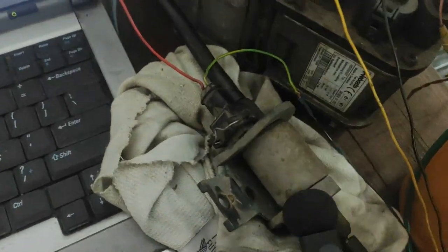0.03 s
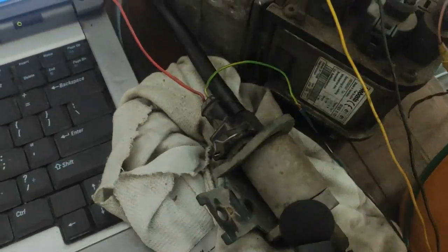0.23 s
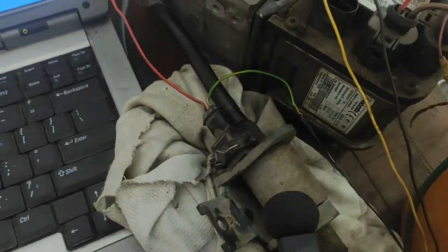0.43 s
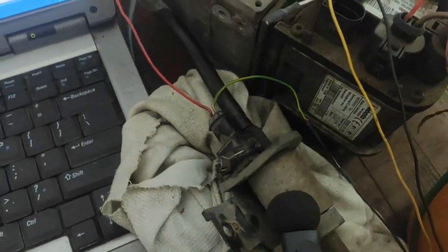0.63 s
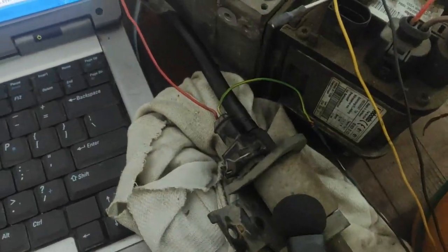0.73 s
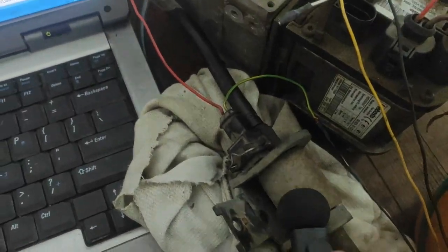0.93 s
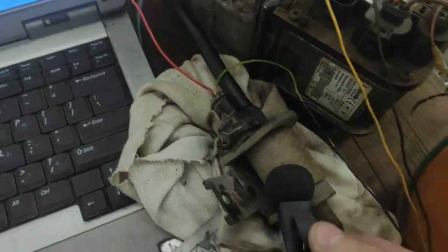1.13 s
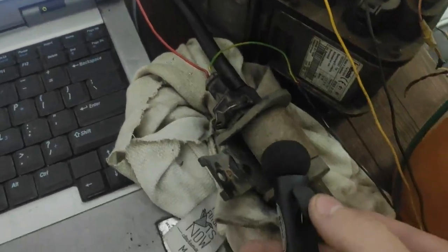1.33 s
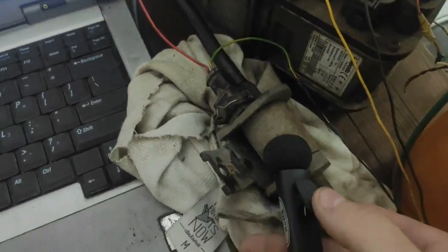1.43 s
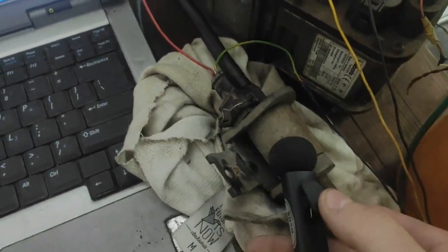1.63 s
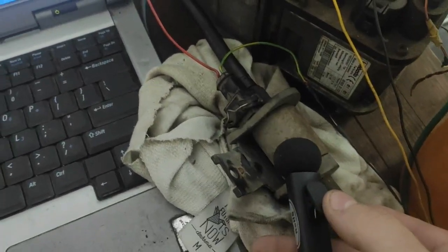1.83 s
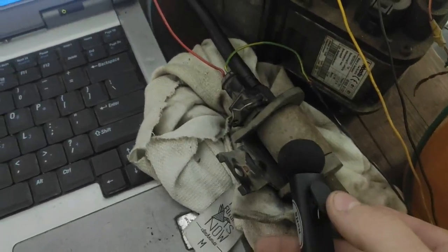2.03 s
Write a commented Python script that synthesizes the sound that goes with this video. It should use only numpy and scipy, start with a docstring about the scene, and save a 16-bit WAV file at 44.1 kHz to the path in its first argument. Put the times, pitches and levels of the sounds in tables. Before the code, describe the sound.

A small solenoid pump ticks steadily five times a second, with microphone handling bumps early on.

```python
"""Ticking, five times a second, from a small solenoid fuel pump on a rag on a workbench, over a faint hum.
Each stroke is a clack of the plunger on its stop and a softer knock back on its seat, made of
filtered impulses, noise chatter and dying casing modes; shaped noise and tones fill the gaps.
A hand moves a microphone up to the pump: rubs, a scrape and rustles of tiny random slips,
clicks and crackles of short dying noise, and bumps as low dying tones. The room answers faintly."""
import sys
import numpy as np
from scipy import signal
from scipy.fft import rfft, irfft, next_fast_len
from scipy.io import wavfile
from scipy.ndimage import map_coordinates

SR = 44100
rng = np.random.default_rng(int(sys.argv[2]) if len(sys.argv) > 2 else 0)


def output_pcm(signal):
    """Save a mono or channel-first signal as 16-bit PCM at the path in sys.argv[1].

    Samples are clipped to [-1, 1] before scaling.
    """
    pcm = np.clip(np.atleast_2d(signal).T, -1, 1) * 32767
    wavfile.write(sys.argv[1], SR, np.round(pcm).astype(np.int16))


N = 92521
T = np.arange(N) / SR  # time in the scene, s
RING = T[:8192]  # time within one short sound, s


def amp(db):
    """Decibels to gain."""
    return 10 ** (np.asarray(db) / 20)


def unit(x):
    """Scale to rms 1."""
    return x / np.sqrt(np.mean(x ** 2) + 1e-20)


def burst(x):
    """Scale to the energy of 5 ms at rms 1."""
    return x * np.sqrt(.005 * SR / (np.sum(x ** 2) + 1e-20))


def colour(x, points):
    """Causal minimum-phase filter through (freq_hz, level_db) points, by folding the cepstrum."""
    m = len(RING)
    hz, db = np.transpose(points)
    log_bins = np.log(np.fft.rfftfreq(m, 1 / SR) + 1)
    cepstrum = irfft(np.log(amp(np.interp(log_bins, np.log(hz), db))))
    cepstrum[1:m // 2] *= 2
    cepstrum[m // 2 + 1:] = 0
    return signal.fftconvolve(x, irfft(np.exp(rfft(cepstrum))))[:len(x)]


def add(out, s, x):
    """Mix x into out at time s, trimmed to the scene."""
    i = int(round(s * SR))
    x = x[max(-i, 0):max(N - i, 0)]
    out[max(i, 0):max(i, 0) + len(x)] += x


def swell(t, rise, fall):
    """A bell that peaks at t = 0."""
    return np.exp(-.5 * (t / np.where(t < 0, rise, fall)) ** 2)


def wander(points, rate_hz):
    """A smooth random curve through new values at the given rate."""
    return map_coordinates(rng.standard_normal(points), [T * rate_hz])


def friction(swells, spectrum, slips_per_s=1500, smooth=0.62, clump_db=0.0):
    """Rubbing: tiny random slips mixed with a smooth share of hiss; clump_db makes the level uneven."""
    slips = rng.standard_normal(N) * (rng.random(N) < slips_per_s / SR)
    grain = np.sqrt(smooth) * rng.standard_normal(N) + np.sqrt(1 - smooth) * unit(slips)
    grain = grain * amp(clump_db * wander(2048, 420))
    level = sum(amp(db) * swell(T - s, rise, fall) for s, rise, fall, db in swells)
    return unit(colour(grain, spectrum)) * level


# Workshop air at the microphone: freq_hz, level_db
AIR_TONE = [(20, -3), (55, -9.5), (92, 2.5), (135, -4.5), (200, -6), (300, -7), (420, -9.5), (620, -16),
            (900, -12.5), (2200, -22.5), (6000, -25.5), (16000, -34)]
# Faint hum: pitch_hz, level_db
HUM = [(198, -62), (408, -69), (594, -70.5)]
AIR_DB = -57
HUM_WAVER_DB, HUM_DRIFT_RAD, WAVER_HZ = 1.5, .5, 12


def background():
    """Workshop air as coloured noise, and hum tones that waver in level and phase."""
    out = amp(AIR_DB) * unit(colour(rng.standard_normal(N), AIR_TONE))
    for hz, db in HUM:
        level = amp(db + HUM_WAVER_DB * wander(256, WAVER_HZ))
        phase = 2 * np.pi * hz * T + HUM_DRIFT_RAD * wander(256, WAVER_HZ)
        out += level * np.sqrt(2) * np.sin(phase)
    return out


# Rebound chatter: freq_hz, level_db
CHATTER_TONE = [(200, 0.5), (900, -14.5), (1600, 4.5), (3000, -0.5), (5000, -11.5), (6400, -5), (8000, -7),
                (11500, -19), (16000, -16.5)]
# Casing modes: pitch_hz, t60_s, clack_level_db, knock_level_db (both relative to the blow)
CASING = [(200, 0.22, -32.5, -31.5), (323, 0.057, -15.5, -3), (601.5, 0.19, -31.5, -49),
          (659, 0.07, -41, -17.5), (793, 0.026, -27.5, -8.5), (1092, 0.042, -20, -16.5),
          (1820, 0.006, -25, -13), (2880, 0.0074, -40, -44), (4310, 0.0032, -40, -42),
          (6300, 0.0047, -25, -23), (6440, 0.0079, -12, -4), (11060, 0.0048, -16, -22)]
COLOUR_VARY_DB = 1.2  # random change at each point of a crack's spectrum


def blow(spectrum, mode_dbs, chatter, vary_db):
    """One impact of the plunger: a hard crack, a rebound chatter and the dying modes of the casing."""
    delay, spread, chatter_db = chatter
    varied = [(hz, db + rng.normal(0, COLOUR_VARY_DB)) for hz, db in spectrum]
    out = burst(colour(1. * (RING == 0), varied))
    rattle = rng.standard_normal(len(RING)) * swell(RING - delay, spread, spread)
    out += amp(chatter_db) * burst(colour(rattle, CHATTER_TONE))
    for (hz, t60, *_), db in zip(CASING, mode_dbs):
        mode = np.sin(2 * np.pi * hz * RING) * amp(-60 * RING / t60)
        out += amp(db + rng.normal(0, vary_db)) * mode
    return out


# Pump strokes: start_s, clack_level_db, knock_level_db, bounce_level_db (relative to the knock)
STROKES = [(-.0182, -17, -29, -22), (0.1826, -16.5, -24, -11), (0.3838, -17.5, -28, -16),
           (0.5847, -19.5, -29.5, -6.5), (0.786, -17, -27, -13), (0.9866, -17, -27.5, -14),
           (1.1876, -17.5, -27.5, -10), (1.3885, -17.5, -26.5, -14), (1.5899, -17.5, -27, -9),
           (1.7907, -17, -28, -5), (1.9918, -17.5, -26.5, -11)]
# Crack on the stop: freq_hz, level_db
CLACK_TONE = [(59, -41.5), (100, -9.5), (315, -5), (818, -15.5), (1130, -2), (1450, -5), (1800, 0.5),
              (2580, -6), (2930, -4), (3320, -13.5), (3950, -10), (4870, -23.5), (6020, -8), (6420, -4.5),
              (7290, -25), (8830, -37.5), (11200, -52), (13500, -70), (16000, -59)]
# Crack on the seat: freq_hz, level_db
KNOCK_TONE = [(59, -27), (100, -13.5), (170, 0.5), (277, 4.5), (705, -3), (950, -1), (1760, -3.5),
              (2580, -13), (2860, -14), (3190, -18), (4980, -16.5), (6420, -12), (7290, -21), (9610, -28.5),
              (11600, -22), (15000, -29), (16000, -25)]
# Bounce on the seat: freq_hz, level_db
BOUNCE_TONE = [(100, -30), (800, -3.5), (1700, 5.5), (2600, -8), (4200, -10.5), (6400, -7), (8000, -33),
               (16000, -30)]
# Rebound chatter of each blow: delay_s, spread_s, level_db
CLACK_CHATTER, KNOCK_CHATTER = (0.0012, 0.00079, -15.5), (0.0014, 0.00088, -14.5)
RETURN_S = .0422  # from clack to knock
BOUNCE_S, BOUNCE_SCATTER_S = 0.001705, .00004


def plunger():
    """The clack on the stop and the opposite knock back on the seat; the knock bounces once."""
    out = np.zeros(N)
    _, _, clack_modes, knock_modes = np.transpose(CASING)
    bounce = burst(colour(1. * (RING == 0), BOUNCE_TONE))
    for s, clack_db, knock_db, bounce_db in STROKES:
        clack = blow(CLACK_TONE, clack_modes, CLACK_CHATTER, vary_db=1.4)
        knock = blow(KNOCK_TONE, knock_modes, KNOCK_CHATTER, vary_db=2.0)
        bounce_s = s + RETURN_S + rng.normal(BOUNCE_S, BOUNCE_SCATTER_S)
        add(out, s, amp(clack_db) * clack)
        add(out, s + RETURN_S, -amp(knock_db) * knock)
        add(out, bounce_s, -amp(knock_db + bounce_db) * bounce)
    return out


def each_stroke(rows):
    """Repeat rows timed from the clack in every stroke."""
    return [(s + after, *rest) for s, *_ in STROKES for after, *rest in rows]


# Plunger sliding: start_s (of the peak, from the clack), rise_s, fall_s, level_db
SLIDES = [(-.0175, 0.0013, 0.0013, -44), (-.012, 0.0014, 0.0015, -41.5), (-.002, .005, 0.0019, -43.5),
          (.004, .003, 0.015, -47), (.0405, 0.0066, 0.0026, -49)]
# Tone of the sliding: freq_hz, level_db
SLIDE_TONE = [(150, -5), (500, 2.5), (1000, 3.5), (1500, -10.5), (3000, -7.5), (4500, -10), (6200, -8.5),
              (8000, -17), (16000, -39)]


def slides():
    """Grainy friction of the plunger within each stroke."""
    return friction(each_stroke(SLIDES), SLIDE_TONE, slips_per_s=850, smooth=0.33)


# Soft casing hums: start_s (of the peak, from the clack), rise_s, fall_s, pitch_hz, level_db
GROANS = [(-0.026, 0.0093, 0.002, 273, -54), (0.024, 0.013, 0.0011, 600, -51),
          (0.0023, 0.0044, 0.011, 1030, -44), (.129, 0.0028, 0.0077, 574, -52.5),
          (0.129, 0.0072, 0.017, 412, -61), (0.079, 0.0089, 0.021, 790, -64)]


def groans():
    """Soft hums of the casing as the plunger moves: swelling sines."""
    out = np.zeros(N)
    t = RING - RING.mean()  # room for the rise before the peak
    for s, rise, fall, hz, db in each_stroke(GROANS):
        tone = np.sqrt(2) * np.sin(2 * np.pi * hz * t)
        add(out, s + t[0], amp(db) * tone * swell(t, rise, fall))
    return out


# Scratch of the plunger: start_s (of the peak, from the clack), rise_s, fall_s, level_db
SCRATCHES = [(.032, 0.00088, 0.0013, -49), (.039, 0.0013, 0.0036, -45.5)]
# Tone of the scratch: freq_hz, level_db
SCRATCH_TONE = [(300, -32), (2000, -7), (4500, 4), (6300, 6), (8500, -7), (11800, 0.5), (14000, -10),
                (16000, -7)]


def scratches():
    """Thin friction of the plunger as it springs back."""
    return friction(each_stroke(SCRATCHES), SCRATCH_TONE)


# Valve chirps: start_s (of the peak, from the clack), rise_s, fall_s, level_db
CHIRPS = [(-.003, 0.00075, 0.00074, -41), (.0388, 0.00076, 0.0017, -45)]
# Tone of the chirps: freq_hz, level_db
CHIRP_TONE = [(100, -40), (4500, -9), (5700, 0), (6300, -6), (6900, 0), (8000, -37), (16000, -38)]


def chirps():
    """Brief high valve noise just before each blow."""
    return friction(each_stroke(CHIRPS), CHIRP_TONE)


# Swish through the pump: start_s (of the peak, from the clack), rise_s, fall_s, level_db
SWISHES = [(.083, 0.021, 0.011, -52.5), (.126, 0.009, 0.012, -57.5)]
# Tone of the swish: freq_hz, level_db
SWISH_TONE = [(100, -14), (700, 7.5), (1300, -3.5), (2200, -2), (4000, -14), (8000, -22), (16000, -27)]


def swishes():
    """Soft noise through the pump after the plunger's return."""
    return friction(each_stroke(SWISHES), SWISH_TONE)


# Casing response around its resonances: centre_hz, width_hz, level_db (negative cuts)
HOLLOWS = [(367, 42, 1), (942, 68, -10), (5080, 1000, -3.5)]


def hollow(x):
    """The casing radiates unevenly between its resonances: peaking filters cut or slightly lift."""
    for hz, width, db in HOLLOWS:
        k = np.tan(np.pi * hz / SR)
        section = lambda q: [1 + q * k + k * k, 2 * (k * k - 1), 1 - q * k + k * k]
        top = section(width / hz * amp(db / 2))
        bottom = section(width / hz * amp(-db / 2))
        x = signal.lfilter(top, bottom, x)
    return x


# Pump tone as the microphone moves in: start_s, boxy_level_db, low_ring_level_db
PLACING = [(0, 6, -3), (.22, 1, -1.5), (0.419, 3.5, -2.5), (.6, -1.5, 0.5), (.85, 0.5, -1), (2.1, -1, -1)]
BOXY_HZ, LOW_RING_HZ = (640, 960), (287, 360)


def placed(x):
    """Two bands of the pump change level with the microphone's position."""
    s, *levels = np.transpose(PLACING)
    for band, db in zip((BOXY_HZ, LOW_RING_HZ), levels):
        bandpass = signal.butter(1, band, "band", fs=SR, output="sos")
        extra = amp(np.interp(T, s, db)) - 1
        x = x + extra * signal.sosfilt(bandpass, x)
    return x


# Shifts of the grip on the microphone: start_s (of the peak), rise_s, fall_s, level_db
SHIFTS = [(.085, 0.023, 0.022, -56), (.29, 0.028, 0.037, -65), (.70, 0.028, 0.017, -61),
          (1.88, 0.013, 0.018, -54)]
# Tone of the shifts: freq_hz, level_db
SHIFT_TONE = [(25, -45), (60, -8), (95, 6), (220, -8), (400, -17), (2000, -46), (16000, -80)]


def grip_shifts():
    """Dull low friction as the grip on the microphone shifts."""
    return friction(SHIFTS, SHIFT_TONE)


# Rubs of the hand: start_s (of the peak), rise_s, fall_s, level_db
RUBS = [(.118, 0.0054, 0.013, -40), (.143, 0.0045, 0.0058, -31.5), (.168, 0.008, 0.011, -31.5),
        (.241, 0.02, 0.017, -39), (.30, 0.025, 0.022, -52), (1.18, 0.036, 0.029, -52)]
# Tone of the rubs: freq_hz, level_db
RUB_TONE = [(60, -4.5), (200, -1), (600, -2), (1400, -5), (2500, 2.5), (3800, -6.5), (5000, -3),
            (7500, -10.5), (12000, -17.5), (16000, -21)]


def rubs():
    """The hand rubs, catching and letting go in clumps of slips."""
    return friction(RUBS, RUB_TONE, slips_per_s=1000, smooth=0.56, clump_db=3.0)


def snaps(rows, spectrum):
    """Small clicks: coloured noise that dies in milliseconds."""
    out = np.zeros(N)
    for s, db in rows:
        noise = rng.standard_normal(len(RING)) * amp(-60 * RING / 0.0045)  # t60 in s
        add(out, s, amp(db) * burst(colour(noise, spectrum)))
    return out


# Handling clicks: start_s, level_db
CLICKS = [(.1378, -34.5), (.1415, -40), (.1462, -36), (.157, -28.5), (.1653, -29), (.1685, -39),
          (.1747, -36), (.1802, -36), (.2055, -30), (.2192, -46.5), (.3228, -33), (.3418, -32.5),
          (.3466, -32)]
# Tone of the clicks: freq_hz, level_db
CLICK_TONE = [(60, -12), (250, 5), (650, -1), (1400, -5.5), (2500, 5), (3700, -11), (5000, -1),
              (6500, -8.5), (8000, -13), (12000, -22), (16000, -23)]


def clicks():
    """Small clicks of the hand as it places the microphone."""
    return snaps(CLICKS, CLICK_TONE)


# Bumps on the microphone: start_s, pitch_hz (at the start), t60_s, level_db
BUMPS = [(0.2372, 110, 0.053, -18.5), (0.3237, 200, 0.013, -6)]
BUMP_SAG = 0.3  # share of its pitch that a bump loses as it dies


def bumps():
    """Knocks on the microphone: the slope of a dying low swing that sags in pitch."""
    out = np.zeros(N)
    for s, hz, t60, db in BUMPS:
        life = amp(-60 * RING / t60)
        turns = np.cumsum(hz * (1 - BUMP_SAG * (1 - life))) / SR
        push = np.sin(2 * np.pi * turns) * life * (1 - np.exp(-2 * turns))  # soft onset
        add(out, s, amp(db) * np.gradient(push) * SR / (2 * np.pi * hz))
    return out


# One firm scrape: start_s (of the peak), rise_s, fall_s
SCRAPE = (.343, .010, .0035)
# Tone of the scrape: freq_hz, level_db
SCRAPE_TONE = [(80, -20), (400, -6), (900, -0.5), (1900, -9), (2800, 4), (3900, -1), (5200, -5.5),
               (6000, -18.5), (10000, -20), (16000, -30)]
SCRAPE_DB = -23


def scrape():
    """Dense friction of the hand that grows and breaks off."""
    return friction([(*SCRAPE, SCRAPE_DB)], SCRAPE_TONE, slips_per_s=3300, smooth=0.77, clump_db=1.5)


# Finger strokes: start_s (of the peak), rise_s, fall_s, level_db
FINGERS = [(.669, 0.012, 0.0097, -49.5), (1.272, 0.0078, 0.0063, -48.5), (1.875, 0.0058, 0.0069, -46),
           (1.928, 0.016, 0.024, -48), (2.002, 0.0082, 0.01, -37.5), (2.072, 0.0084, 0.011, -40)]
# Tone of the fingers: freq_hz, level_db
FINGER_TONE = [(60, -3), (300, -12), (650, 3.5), (1100, 4), (1700, -4.5), (2600, -3.5), (3600, -7),
               (5000, -6), (7500, -17), (16000, -26)]


def fingers():
    """Softer strokes of the fingers, mostly sparse slips."""
    return friction(FINGERS, FINGER_TONE, slips_per_s=690, smooth=0.23)


# Light dry rustles: start_s (of the peak), rise_s, fall_s, level_db
RUSTLES = [(.672, 0.0079, 0.0089, -48), (.73, 0.037, 0.081, -56), (1.88, 0.0036, .006, -68)]
# Tone of the rustles: freq_hz, level_db
RUSTLE_TONE = [(100, -12), (1000, -7), (2500, 4), (5000, -1), (9000, -2.5), (16000, -11)]


def rustles():
    """Light dry rustles of few, separate slips."""
    return friction(RUSTLES, RUSTLE_TONE, slips_per_s=210, smooth=0.4)


# Thin crackles: start_s, level_db
CRACKLES = [(.675, -46), (.724, -53), (.7913, -29.5), (.8485, -47)]
# Tone of the crackles: freq_hz, level_db
CRACKLE_TONE = [(200, -3), (2000, -6), (5000, -7.5), (8500, -7), (11000, -17), (16000, -29)]


def crackles():
    """Thin crackles during the handling."""
    return snaps(CRACKLES, CRACKLE_TONE)


ROOM_T60_S, ROOM_DB = 0.076, -25


def room(near):
    """The workshop's faint answer: a short tail of dying coloured noise."""
    t = T[:SR // 2]
    noise = rng.standard_normal(len(t)) * amp(-60 * t / ROOM_T60_S)
    tail = colour(noise, [(500, 7.0), (2000, -8.5), (8000, -15)])
    return amp(ROOM_DB) * signal.fftconvolve(near, tail / np.linalg.norm(tail))[:N]


def scene():
    """Pump and hand are close to the microphone, so the room answers only faintly."""
    pump = plunger() + slides() + groans() + scratches() + chirps() + swishes()
    hand = grip_shifts() + rubs() + clicks() + bumps() + scrape() + fingers() + rustles() + crackles()
    near = placed(hollow(pump)) + hand
    return (near + room(near) + background())[None]


LOW_CUT_HZ, TOP_HZ = 76, 16100


def record(dry):
    """The microphone thins the deep bass; nothing is kept above the band limit."""
    highpass = signal.butter(1, LOW_CUT_HZ, "high", fs=SR, output="sos")
    thin = signal.sosfilt(highpass, dry)
    m = next_fast_len(N + SR // 2)
    kept = np.fft.rfftfreq(m, 1 / SR) < TOP_HZ
    return irfft(rfft(thin, m) * kept, m)[..., :N]


dry = scene()
out = record(dry)
output_pcm(out)
```